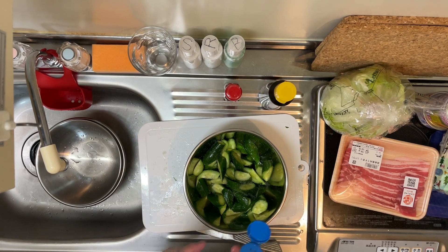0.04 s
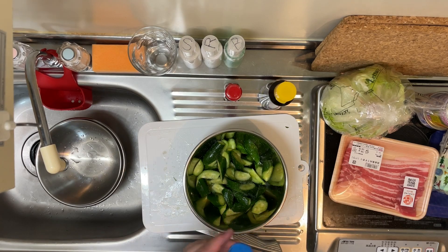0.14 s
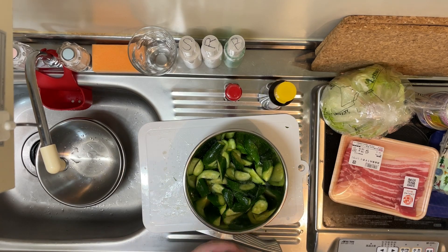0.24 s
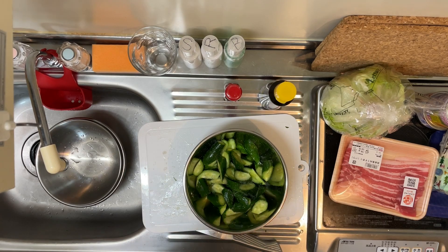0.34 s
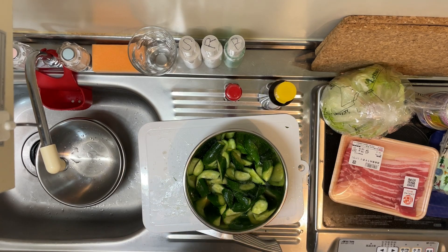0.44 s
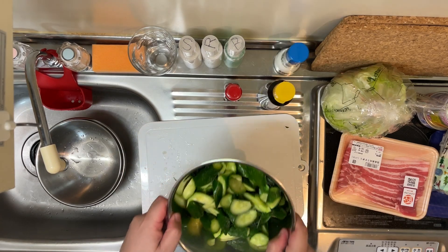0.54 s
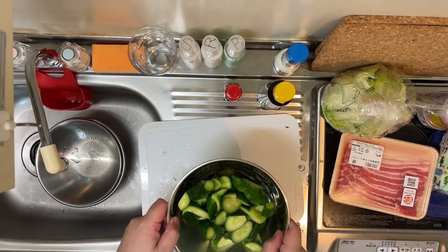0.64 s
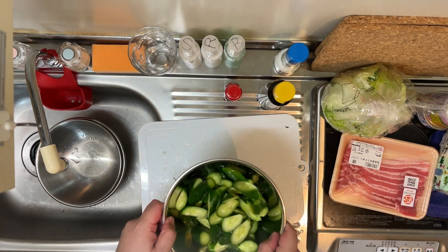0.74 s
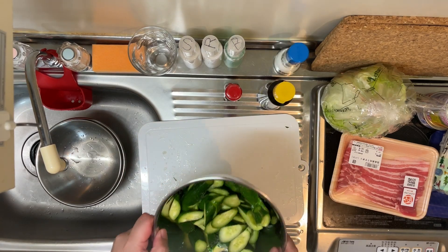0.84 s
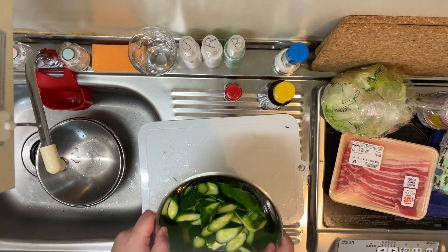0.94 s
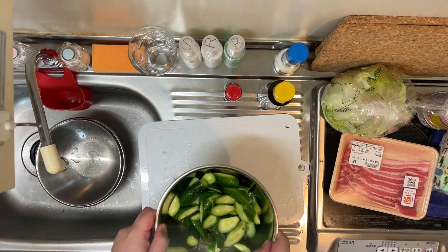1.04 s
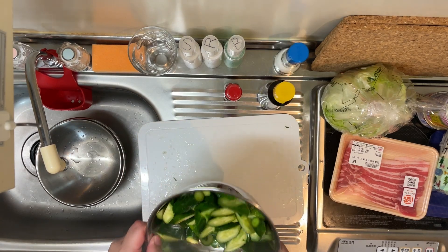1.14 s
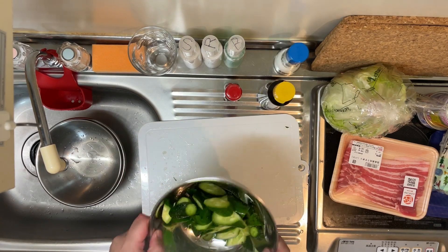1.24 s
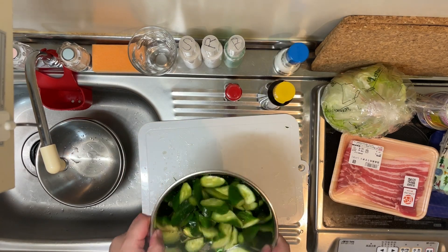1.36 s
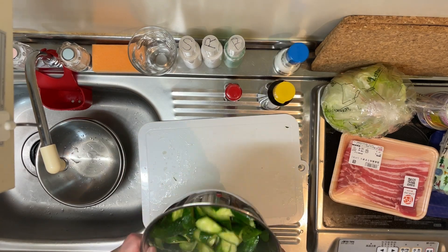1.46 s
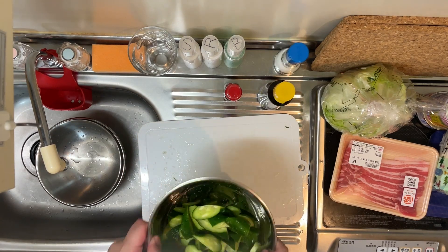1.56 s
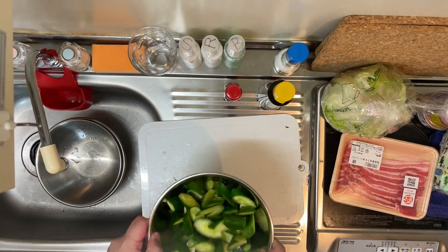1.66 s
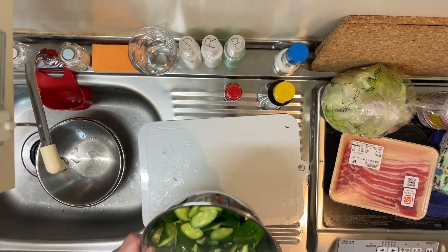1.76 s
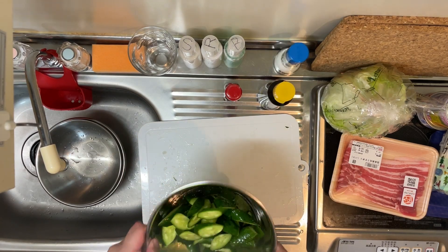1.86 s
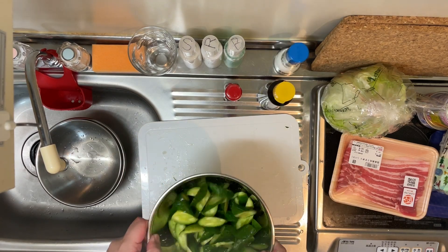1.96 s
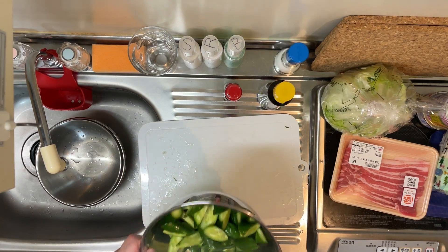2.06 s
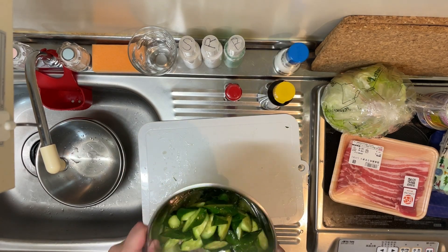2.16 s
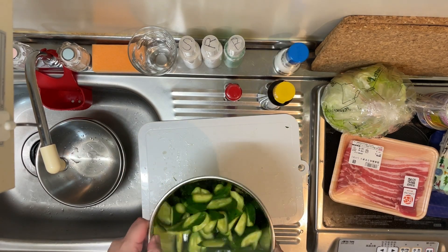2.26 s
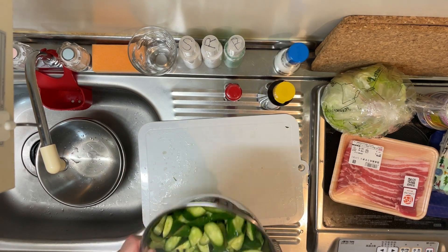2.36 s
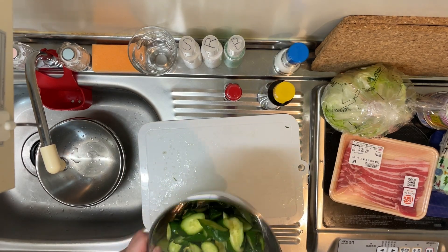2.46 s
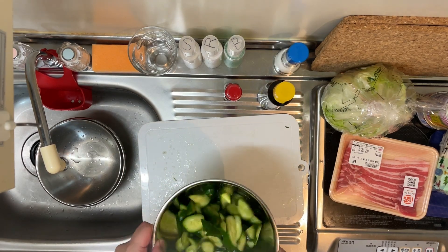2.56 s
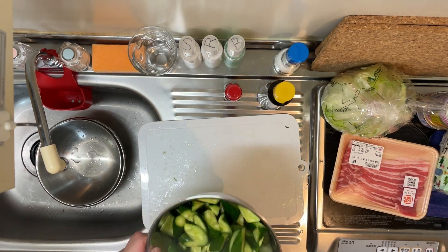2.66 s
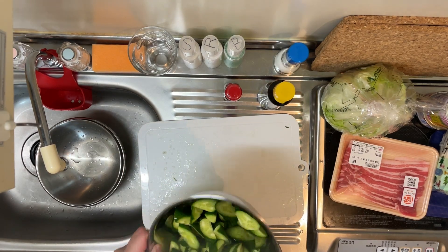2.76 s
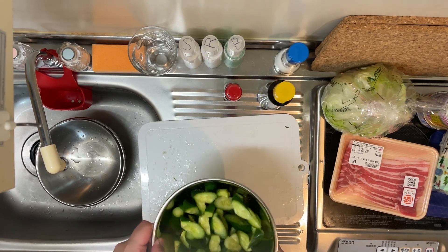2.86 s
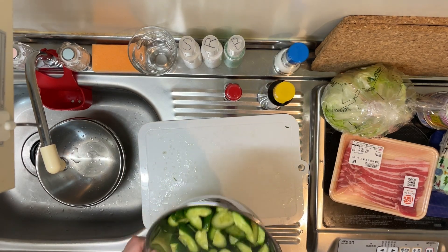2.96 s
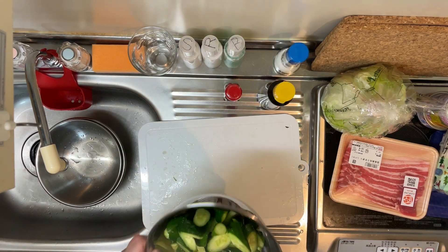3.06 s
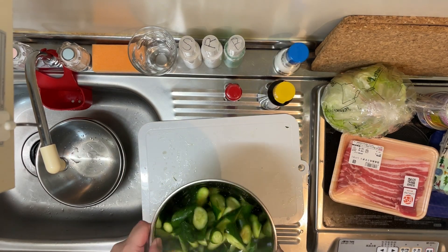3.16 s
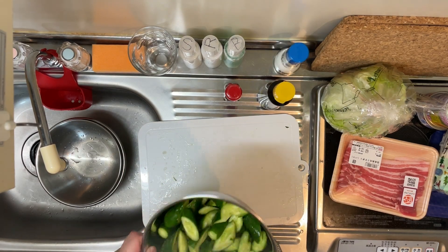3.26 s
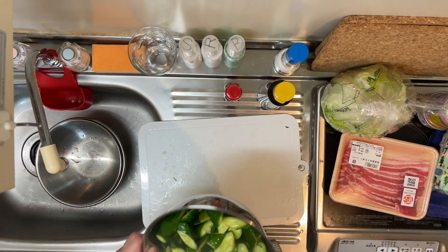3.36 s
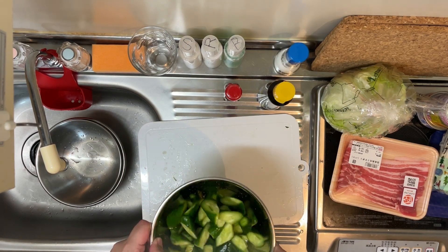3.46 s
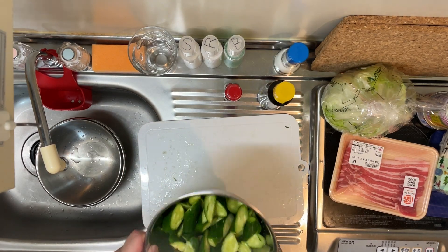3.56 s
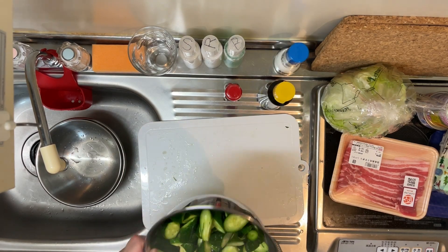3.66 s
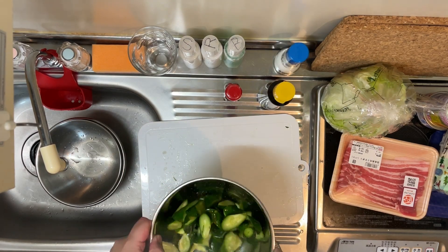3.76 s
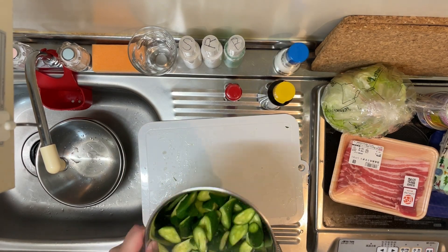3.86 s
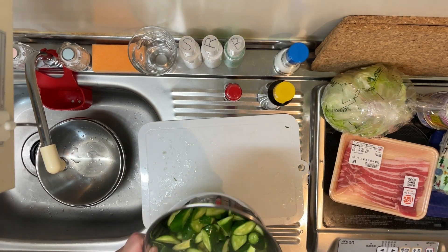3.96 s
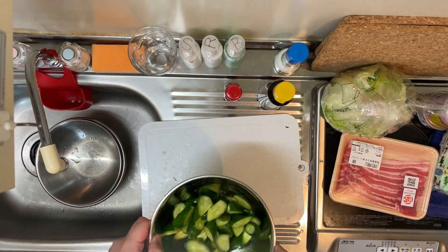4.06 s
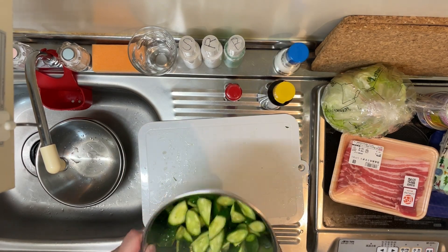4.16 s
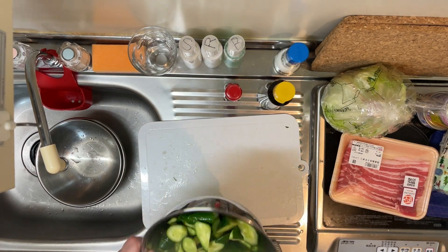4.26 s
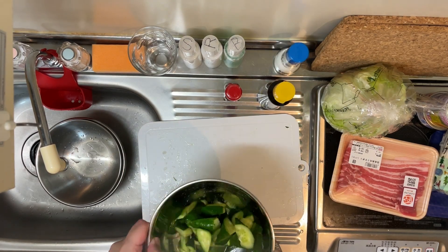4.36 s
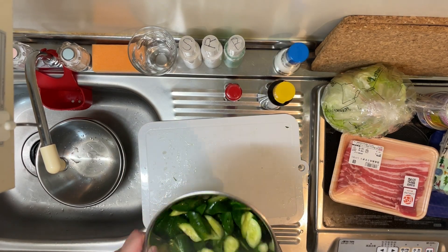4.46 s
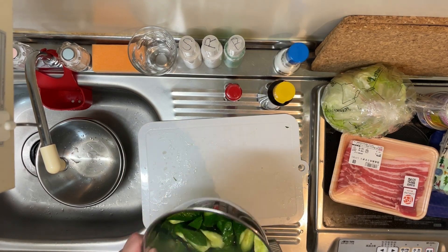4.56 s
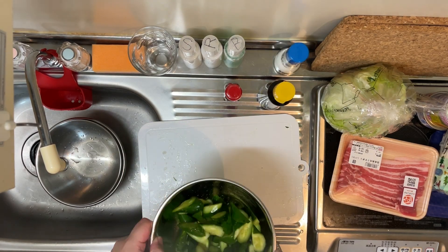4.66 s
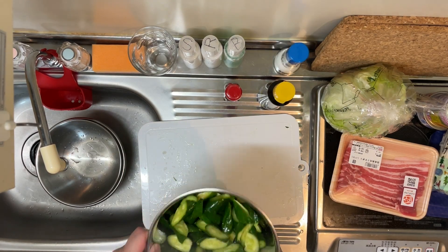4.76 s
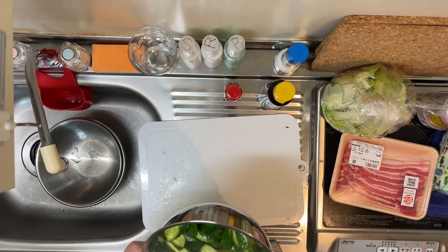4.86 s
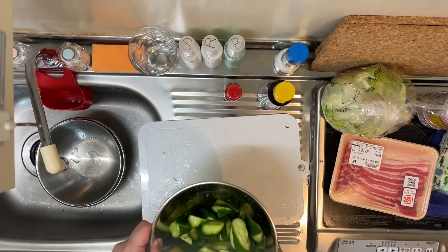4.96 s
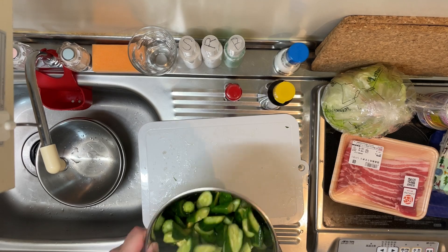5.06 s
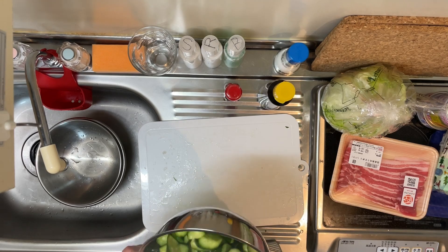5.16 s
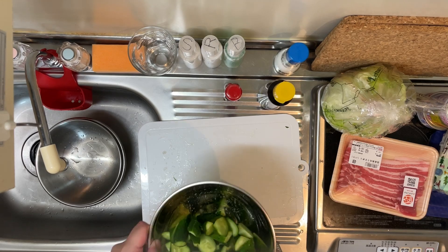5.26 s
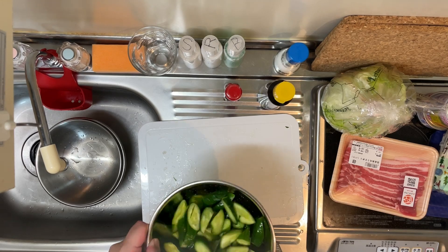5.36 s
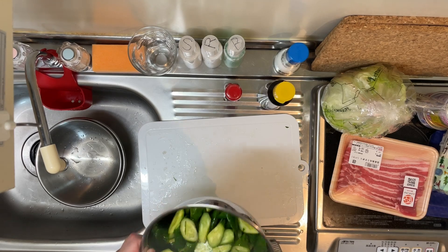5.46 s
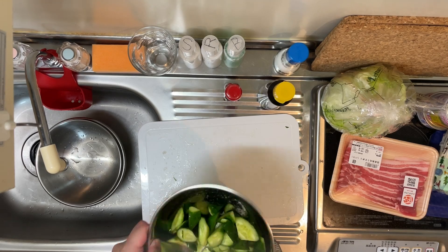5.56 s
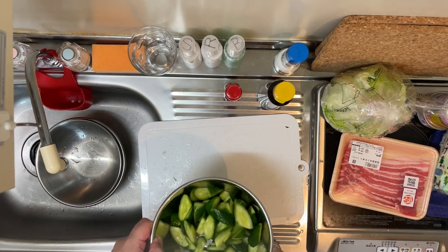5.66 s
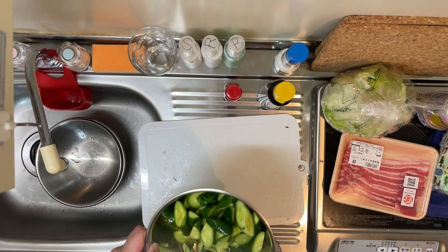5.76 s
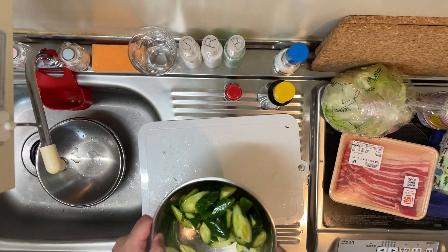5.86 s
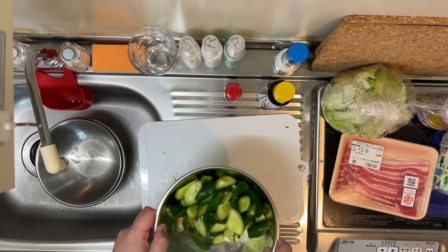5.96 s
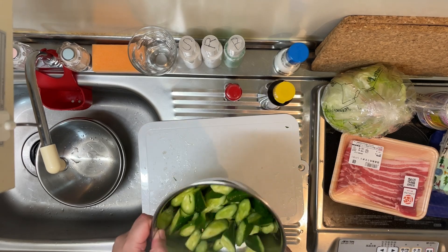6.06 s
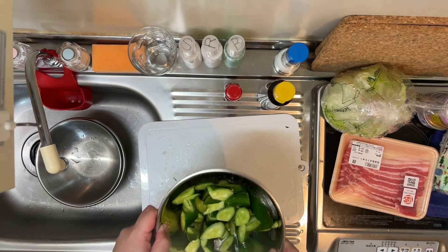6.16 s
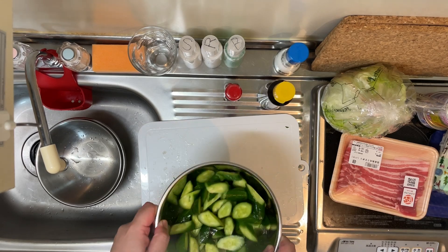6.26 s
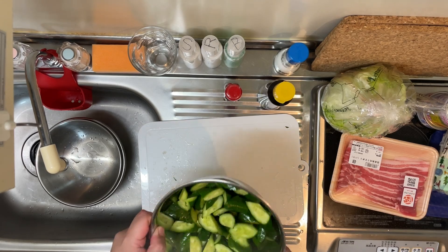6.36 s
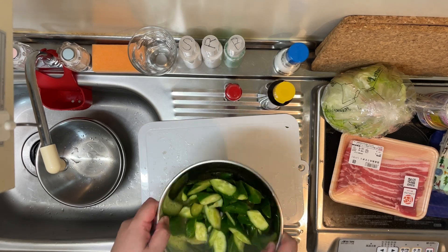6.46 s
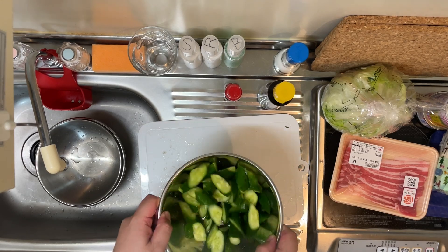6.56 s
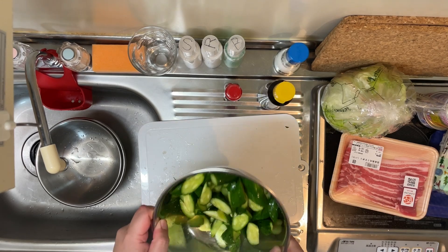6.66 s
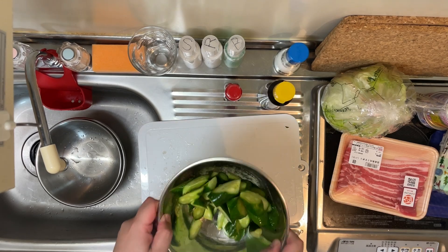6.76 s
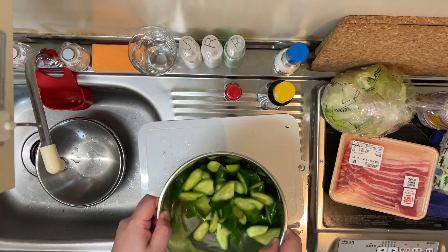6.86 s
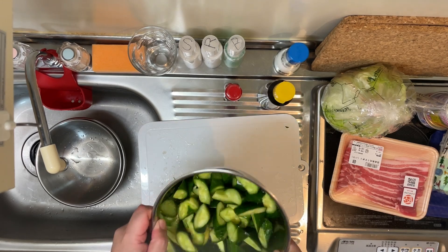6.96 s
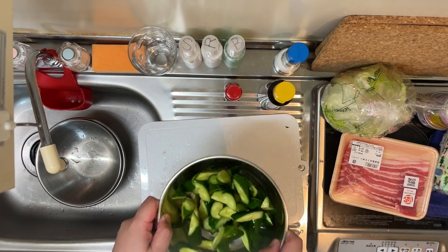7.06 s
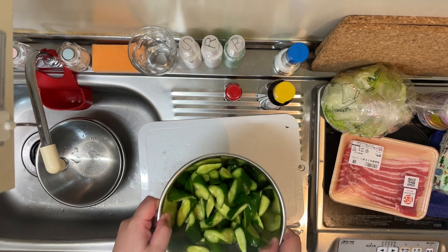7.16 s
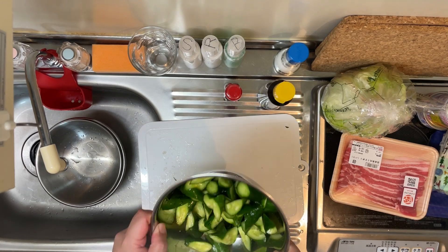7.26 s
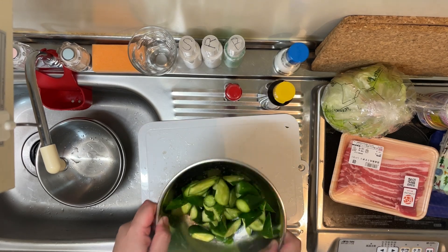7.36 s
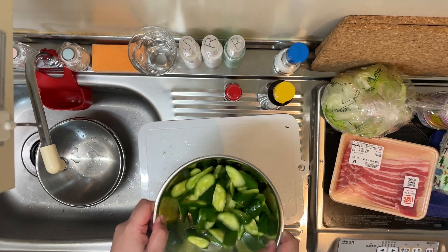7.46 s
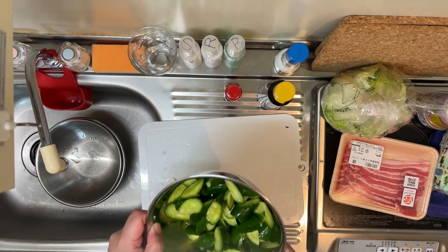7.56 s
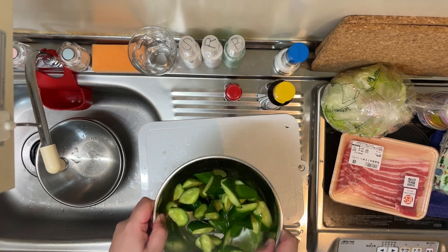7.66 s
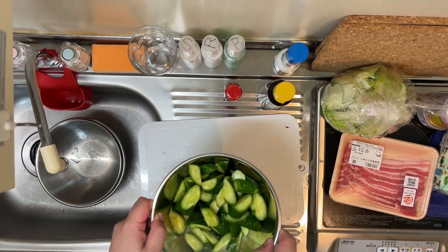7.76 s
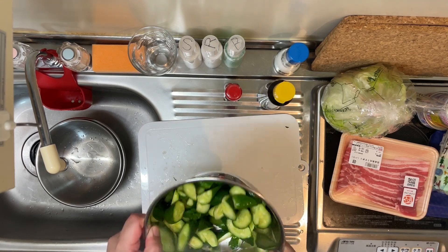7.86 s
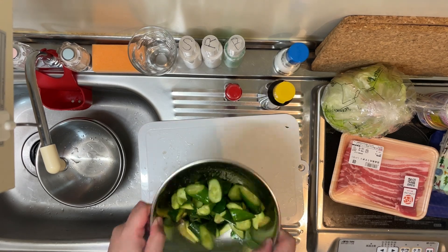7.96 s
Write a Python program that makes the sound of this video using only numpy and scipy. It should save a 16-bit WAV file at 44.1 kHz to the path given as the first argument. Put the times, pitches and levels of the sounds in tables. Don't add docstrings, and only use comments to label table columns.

```python
import sys
import numpy as np
from scipy import signal
from scipy.fft import rfft, irfft, next_fast_len
from scipy.io import wavfile

SR = 44100
rng = np.random.default_rng(int(sys.argv[2]) if len(sys.argv) > 2 else 0)


def store_wav(level_fs):
    pcm = np.round(np.clip(np.atleast_2d(level_fs), -1, 1) * 32767)
    wavfile.write(sys.argv[1], SR, pcm.T.astype(np.int16))


def convert_level_to_amplitude(level_db):
    exponent = np.asarray(level_db, float) / 20
    return 10 ** exponent


N = 353241

# f/Hz, density/dB
HUM = [(30, -35), (80, 0), (290, 1.5), (400, -11.5), (700, -13.5), (1100, -14.5), (2000, -18.5),
       (2600, -25.5), (3600, -26.5), (4500, -43), (10000, -58), (16000, -68)]
# f/Hz, width/Hz, level/dB
FAN_TONES = [(73.5, 15, -51), (288, 7.8, -51), (550, 19, -60), (692, 31, -58)]
# t/s, level/dB
FINGERS = [
    (.025, -74),
    (.045, -60.5),
    (.1, -64),
    (.16, -80),
    (.2, -87),
]
# t/s, knock level/dB, crack level/dB
BOTTLE = [
    (0.3126, -28, -36),
    (0.3139, -30, -40),
    (0.3148, -18.5, -48.5),
    (0.339, -28, -10),
    (0.343, -32, -26),
]
# f/Hz, level/dB, t60/s
COUNTER = [(320, 4.5, 0.08), (494, -8, 0.028), (760, -3, 0.018), (1000, 2, 0.019), (1500, -4.5, 0.012),
           (2480, -3.5, 0.012)]
# f/Hz, density/dB
BOTTLE_CRACK = [(200, -17), (500, -2), (916, -0.5), (2050, -13), (3900, -8.5), (5730, -13), (9230, -4.5),
                (16000, -16)]
# t/s, peak level/dB, f/Hz
DROPLETS = [(0.5836, -53, 9400), (0.7885, -22, 8400), (0.8375, -40, 9400), (1.1892, -51, 9500),
            (2.6414, -20, 8800), (3.014, -31, 9350), (3.232, -24, 7560), (3.3024, -39, 8900),
            (3.368, -37, 8070), (4.5659, -31, 7960), (4.6404, -47, 9300), (5.397, -17.5, 9400),
            (5.5044, -46, 9600), (5.881, -49, 10400), (6.1505, -37, 6411), (6.3267, -23, 7200),
            (6.4383, -46, 9400), (6.9435, -25, 8650), (6.9853, -27, 9600), (7.225, -37, 8800),
            (7.647, -45.5, 10220), (7.9079, -41.5, 8800)]
# t/s, peak level/dB, f/Hz
SLAPS = [(0.73, -19.5, 7200), (0.758, -21.5, 14800), (1.048, -15, 8600), (1.0562, -22, 14500),
         (1.3357, -21, 7000), (1.3631, -19.5, 8750), (1.6615, -16, 5760), (1.684, -17, 9100),
         (1.9533, -20, 7500), (2.2512, -21, 7200), (2.2766, -18.5, 7540), (2.61, -13.5, 5700),
         (3.2045, -19, 9000), (3.514, -19, 7300), (3.8014, -22, 8400), (3.835, -16, 9000),
         (4.1226, -16.5, 7400), (4.1394, -18, 8850), (4.4105, -13, 7060), (5.035, -15.5, 6250),
         (5.3363, -30, 5900), (5.3657, -20, 7400), (5.686, -20.5, 8700), (5.97, -17, 7460),
         (6.2656, -29, 7100), (6.5625, -25, 8604), (6.586, -21, 8650), (6.866, -16, 8600),
         (7.4538, -21.5, 8342), (7.4882, -19.5, 8850), (7.7451, -15.5, 5440)]
# f/Hz, density/dB
WET = [(710, -9.5), (1370, 3.5), (1770, -19), (1950, 2), (3080, -1), (8820, -13.5), (11800, -17.5),
       (14400, -12), (16000, -17.5)]
# f/Hz, width/Hz, level/dB
WET_RINGS = [(5650, 300, -9), (6950, 350, -4), (8600, 450, -2), (9250, 400, -5)]
# t/s, peak level/dB
NUDGES = [(0.671, -23), (0.702, -15), (1.01, -14), (2.568, -19), (3.48, -21), (4.373, -20), (4.684, -17.5),
          (4.982, -19), (5.315, -21), (5.617, -21.5), (5.922, -12), (6.047, -17.5), (6.186, -23),
          (6.228, -16.5), (6.33, -17), (6.478, -18), (6.505, -14), (6.635, -21.5), (7.108, -18),
          (7.126, -17), (7.716, -20)]
# t/s, click level/dB, wet level/dB
GRAZES = [(0.701, -29.5, -28), (1.924, -26, -19), (2.231, -25.5, -43), (2.546, -38, -38),
          (2.566, -24, -17.5), (2.859, -29, -26), (3.486, -20, -26), (3.781, -36, -26), (4.0617, -42, -39),
          (4.222, -48, -51), (4.379, -26.5, -24.5), (4.6807, -29, -29.5), (4.977, -42, -39),
          (5.008, -33, -22), (5.315, -38, -37), (5.777, -23.5, -28), (5.92, -31, -41), (6.8456, -22, -47),
          (7.428, -29, -25.5)]
# t/s, peak level/dB, f/Hz
CLACKS = [(6.255, -21, 2070), (6.9853, -26.5, 1510), (0.7205, -20, 2200), (0.727, -10, 1476),
          (0.751, -12, 2280), (1.0485, -16.5, 3250), (1.3607, -14, 3170), (1.9858, -18, 4000),
          (2.0028, -9.5, 3140), (2.253, -18, 4170), (2.275, -20, 4400), (3.1965, -30, 3320),
          (3.7903, -20, 4170), (3.805, -12, 3250), (4.0613, -28, 2320), (4.2225, -32, 1103),
          (4.7159, -5.5, 3250), (5.035, -13, 3520), (5.0497, -4.5, 3170), (5.339, -14.5, 4290),
          (5.3676, -11, 3280), (5.675, -16.5, 2540), (5.6845, -11.5, 3020), (5.9692, -18, 4070),
          (6.5591, -17.5, 3010), (6.5859, -14.5, 3100), (6.8821, -10.5, 3250), (7.1477, -8, 3150),
          (7.4457, -17, 3220), (7.4631, -13.5, 3200), (7.769, -14, 3040)]
# level/dB, width/f, t60/s
CLACK_SHAPE = (-9.5, 0.7, 0.045)
# f/Hz, level/dB, t60/s
BOWL_HIGH = [(2250, -3, .04), (3150, 0, .065), (3230, -3.5, .04), (3960, -5, .035)]
# t/s, thud level/dB, wall click level/dB
LEADERS = [(0.714, -4.5, -40), (1.0283, -9, -14), (1.3277, -13.5, -17.5), (1.6345, -17.5, -30),
           (1.9531, -23, -30), (2.2609, -19.5, -48), (2.5963, -25, -31), (2.8768, -20, -38),
           (3.1658, -21, -25), (3.5, -25, -18), (3.8028, -20, -27), (4.1105, -18, -24), (4.4074, -25, -25),
           (4.7185, -13, -37), (5.0195, -18, -38), (5.3376, -13.5, -21), (5.6311, -16.5, -24.5),
           (5.9452, -23, -27), (6.2403, -16.5, -40), (6.531, -17, -30), (6.8263, -23, -32),
           (7.1428, -14, -36), (7.443, -17, -26), (7.7405, -10.5, -18)]
# t/s, peak level/dB, struck spot f/Hz
THUDS = [(0.7205, -2, 699), (0.7545, -18, 810), (1.0604, -5, 696), (1.6875, -21, 706), (1.9857, -14.5, 568),
         (2.0006, -11.5, 675), (2.2765, -15.5, 650), (2.284, -18.5, 640), (2.6145, -24, 667),
         (2.8575, -26.5, 760), (3.1986, -15, 710), (3.5097, -15.5, 667), (3.53, -22, 760), (3.85, -24, 720),
         (4.4166, -12.5, 595), (4.746, -13, 736), (5.0319, -17.5, 680), (5.066, -16, 566),
         (5.3574, -9.5, 550), (5.9654, -10, 660), (5.9733, -7.5, 670), (5.9989, -13, 695),
         (6.2545, -9, 654), (6.2905, -12, 760), (6.3019, -7.5, 688), (6.8745, -17, 580),
         (6.8823, -11, 529.2), (6.898, -18, 650), (7.1701, -13, 577), (7.187, -12.5, 656),
         (7.4568, -12, 703)]
# t/s, peak level/dB, struck spot f/Hz
MORE_LANDINGS = [(0.7312, -15, 760), (1.0468, -11, 644), (1.0738, -18, 730), (1.0925, -25, 604),
                 (1.3642, -22, 694), (1.3947, -25, 680), (1.6582, -16, 860), (1.6702, -16, 910),
                 (1.6904, -15.5, 820), (1.7022, -24, 530), (1.71, -26, 796), (1.9743, -21, 615),
                 (2.6027, -27, 680), (2.6191, -23, 686), (2.6304, -24, 640), (2.6436, -26, 677),
                 (2.9087, -21.5, 640), (3.239, -20, 667), (3.8124, -16.5, 756), (3.835, -21, 706),
                 (4.1221, -14.5, 695), (4.1297, -14, 690), (4.1373, -36, 614), (4.4334, -23, 644),
                 (4.7261, -11.5, 700), (4.7393, -32, 646), (5.0498, -20, 700), (5.0775, -19, 740),
                 (5.0852, -16.5, 760), (5.3668, -14, 654), (5.3826, -12, 700), (5.651, -17.5, 700),
                 (5.6584, -15.5, 630), (5.667, -15, 595), (5.6842, -20, 795), (5.6919, -19, 700),
                 (5.7001, -16, 656), (5.7096, -20.7, 656), (5.9521, -18, 690), (5.9823, -22, 666),
                 (6.0111, -18, 664), (6.2763, -14, 720), (6.5621, -14.5, 790), (6.5773, -15, 670),
                 (6.587, -16, 680), (6.6032, -14.5, 700), (6.847, -19, 670), (6.903, -22, 630),
                 (6.934, -19, 736), (7.1567, -14, 670), (7.2007, -22.5, 676.4), (7.4501, -19, 604),
                 (7.4742, -17, 560), (7.4958, -17, 660), (7.517, -21, 654), (7.7465, -8, 730),
                 (7.7615, -12.5, 670), (7.7737, -23, 600), (7.7853, -16.5, 760), (7.7956, -32, 580.5)]
# f/Hz, level/dB, t60/s
BOWL_LOW = [(464.3, -0.5, 0.067), (532.3, -1, 0.092), (595, -5, 0.035), (661, -1, 0.064), (694, -3, 0.038),
            (748, -3.5, 0.1), (896, -3, 0.073), (1052, 0, 0.033)]
# f/Hz, level/dB, t60/s
HEAP = [(202.6, -34.5, 0.1), (246, -16, 0.043), (317, -19, 0.044), (1430, -23.5, 0.01), (1590, -26, 0.011)]
# start t/s, fullest t/s, settled t/s, rumble level/dB, wet sliding level/dB
TUMBLE = [(0.72, 0.789, 0.84, -29, -46.5), (1.021, 1.062, 1.112, -22.5, -29),
          (1.335, 1.36, 1.434, -21, -31.5), (1.639, 1.683, 1.727, -19, -29.5),
          (1.931, 1.949, 2.046, -23.5, -35), (2.244, 2.291, 2.327, -20, -31),
          (2.565, 2.612, 2.67, -18, -30.5), (2.859, 2.89, 2.92, -21.5, -31.5),
          (3.163, 3.196, 3.27, -21, -34), (3.468, 3.523, 3.56, -21.5, -31.5),
          (3.771, 3.815, 3.885, -21.5, -32), (4.073, 4.132, 4.19, -23, -32.5),
          (4.385, 4.422, 4.5, -22.5, -30.5), (4.703, 4.74, 4.777, -18, -32), (5.011, 5.06, 5.1, -22, -29),
          (5.327, 5.361, 5.443, -18, -31.5), (5.639, 5.689, 5.743, -23, -31.5),
          (5.906, 5.986, 6.08, -24.5, -37), (6.24, 6.289, 6.33, -21, -30.5),
          (6.507, 6.573, 6.66, -23, -38.5), (6.838, 6.878, 6.99, -24.5, -36),
          (7.118, 7.183, 7.24, -23, -38), (7.42, 7.497, 7.54, -21, -37), (7.74, 7.778, 7.816, -16.5, -31)]
# t/s, peak level/dB, f/Hz
SPITS = [(0.718, -31, 8550), (0.7409, -34, 9900), (1.0641, -22, 8900), (1.0744, -21.5, 8610),
         (1.37, -21.5, 11640), (1.6672, -25, 8950), (1.701, -24, 12000), (1.7316, -31, 9800),
         (1.7459, -33, 8880), (1.9735, -30, 9260), (2.03, -36, 9000), (2.5761, -21.5, 9040),
         (2.5883, -23, 8660), (2.6423, -28, 8800), (3.2342, -33.0, 13730), (3.5012, -40, 8810),
         (3.5325, -31, 8840), (3.8704, -28, 9350), (4.1438, -27.7, 9110), (4.4417, -29, 8580),
         (5.048, -23, 8900), (5.3392, -30, 8577), (5.4025, -30, 9290), (5.7007, -36, 8670),
         (5.7229, -46, 7820), (6.897, -22.5, 8650), (7.17, -25, 8600), (7.8041, -36, 8936)]
# t/s, peak level/dB, f/Hz
KNOCKS = [(0.7213, -16, 2280), (0.741, -25, 1070), (0.771, -26.5, 1250), (1.0316, -31, 1150),
          (1.0448, -22, 1050), (1.4157, -38, 1390), (2.009, -24, 2450), (2.2547, -29, 1040),
          (2.279, -28, 2330), (2.617, -18, 1070), (3.1707, -25.5, 1360), (3.5156, -19, 1210),
          (3.5388, -24, 1180), (3.816, -23, 1420), (4.062, -28, 1500), (4.135, -23.5, 2000),
          (4.4211, -37, 1060), (4.717, -17.5, 1380), (5.0508, -18.5, 2290), (5.3593, -23.8, 1060),
          (5.6507, -23, 1150), (6.0145, -27, 1340), (6.578, -24, 2293), (6.6092, -31.0, 1440),
          (7.479, -26, 2330), (7.8155, -28, 1050)]
# t/s, peak level/dB, f/Hz
WALL_SINGS = [(0.728, -32, 3090), (1.0467, -27, 3194), (1.073, -35, 3125), (1.337, -33, 3170),
              (1.3694, -25.5, 3160), (1.637, -34, 3130), (1.951, -32, 3200), (2.288, -28.5, 3200),
              (3.179, -34, 3170), (3.1944, -30, 3180), (3.811, -25, 3170), (3.825, -31, 3110),
              (4.1237, -32, 3040), (4.719, -32, 3164), (5.051, -28, 3160), (5.0968, -35, 3190),
              (5.683, -26, 3066), (6.564, -29, 3090), (7.175, -33, 3250), (7.4762, -31, 3080),
              (7.745, -29, 3130)]
# t/s, peak level/dB
TINGS = [
    (5.881, -47),
    (6.151, -41.5),
]
# f/Hz, level/dB, t60/s
RIM = [(4530, -7, .13), (5340, -5, 0.13), (6000, -5, .08), (6440, -7, 0.09), (6920, -3, .045),
       (7620, -7, 0.088)]
# t/s, peak level/dB
SLAMS = [(0.753, -12.5), (1.686, -9), (2.295, -15), (2.613, -9), (3.502, -12), (3.5285, -10.5),
         (3.848, -13), (4.7175, -8), (6.873, -8.5), (6.8965, -11), (7.7395, -7.5)]
# t/s, peak level/dB, f/Hz
TICKS = [(0.7813, -30, 6900), (1.061, -37, 4030), (1.361, -25, 4080), (1.4005, -29, 7450),
         (1.6358, -33, 4230), (1.7017, -23, 3880), (1.9369, -33.6, 7160), (1.98, -43, 5340),
         (2.2758, -21.5, 4130), (2.289, -40, 6000), (2.584, -24, 6600), (2.633, -34.1, 6910),
         (2.8847, -29, 3940), (3.1963, -30, 3440), (4.1088, -33, 4000), (4.122, -26.5, 3980),
         (4.45, -25, 4180), (4.7157, -22, 3850), (5.0977, -32, 4160), (5.3296, -34, 4230),
         (5.3683, -24, 4130), (5.7244, -37, 7400), (5.9902, -31, 3990), (6.2546, -28, 3750),
         (6.2935, -23.5, 3950), (7.142, -31, 4130), (7.7373, -32, 5545), (7.773, -37, 3950)]

LEADER_LAG_S, LEADER_CLICK_HZ = 0.00094, (1850, 2490)


def rms_one(x):
    return x / np.sqrt(np.mean(x ** 2) + 1e-20)


def add(out, s, burst):
    at = int(s * SR)
    out[at:at + len(burst)] += burst[:N - at]


def clicks(times_s, gains):
    out = np.full(N, 1e-18)
    np.add.at(out, np.round(np.asarray(times_s) * SR).astype(int), gains)
    return out


def ring(x, hz, t60_s):
    r = convert_level_to_amplitude(-60 / (t60_s * SR))
    w = 2 * np.pi * hz / SR
    return signal.lfilter([0, np.sin(w)], [1, -2 * r * np.cos(w), r * r], x)


def resonance(x, hz, width_hz):
    r = np.exp(-np.pi * width_hz / SR)
    w = 2 * np.pi * hz / SR
    return signal.lfilter([(1 - r * r) / 2, 0, (r * r - 1) / 2], [1, -2 * r * np.cos(w), r * r], x)


def soft(x, hz):
    r = np.exp(-2 * np.pi * hz / SR)
    return signal.lfilter([(1 - r) ** 2], [1, -2 * r, r * r], x)


def dying(x, t60_s):
    return signal.lfilter([1], [1, -convert_level_to_amplitude(-60 / (t60_s * SR))], x)


def coloured(spectrum, x):
    size = next_fast_len(N)
    hz = np.maximum(np.fft.rfftfreq(size, 1 / SR), 10)
    point_hz, point_db = np.transpose(spectrum)
    gain = convert_level_to_amplitude(np.interp(np.log(hz), np.log(point_hz), point_db))
    return rms_one(irfft(rfft(x, size) * gain, size)[:N])


def grains(per_s, spread_db):
    sizes = convert_level_to_amplitude(spread_db * np.minimum(rng.exponential(1, N), 4)) * rng.choice([-1, 1], N)
    return rms_one(sizes * (rng.random(N) < per_s / SR))


def drift(rate_hz):
    slow = rms_one(soft(rng.standard_normal(N // 20 + 2), 20 * rate_hz))
    return np.interp(np.arange(N) / 20, np.arange(len(slow)), 2 * np.tanh(slow / 2))


def struck(events, modes, reach, scatter_db):
    s, peak_db, spot_hz = np.transpose(events)
    luck = rng.standard_normal((len(s), len(modes)))
    near = np.array([np.exp(-(np.log(hz / spot_hz) / reach) ** 2) * convert_level_to_amplitude(db) for hz, db, t60_s in modes]).T
    near = (near + 0.073) * convert_level_to_amplitude(scatter_db * luck)
    share = near / near.sum(axis=1, keepdims=True)
    out = np.zeros(N)
    for k, (hz, db, t60_s) in enumerate(modes):
        out += ring(clicks(s, convert_level_to_amplitude(peak_db) * share[:, k]), hz, t60_s)
    return out


def pats(contacts, gain_db, width_share, t60_s):
    out, age = np.zeros(N), np.arange(2500) / SR
    for (s, db, hz), noise in zip(contacts, rng.standard_normal((len(contacts), len(age)))):
        burst = resonance(noise * convert_level_to_amplitude(-60 * age / t60_s), hz, width_share * hz)
        burst = resonance(burst, hz, 2 * width_share * hz)
        add(out, s, convert_level_to_amplitude(db + gain_db) * burst / np.abs(burst).max())
    return out


def toss_level(levels_db, edge_db, lead_s, settle_s, rest_db):
    rows = []
    for (start, fullest, settled, *_), db in zip(TUMBLE, levels_db):
        rows += [(start - lead_s, rest_db), (start, db + edge_db), (fullest, db)]
        rows += [(settled, db + edge_db), (settled + settle_s, rest_db)]
    s, db = np.transpose(rows)
    return convert_level_to_amplitude(np.interp(np.arange(N) / SR, s, db))


def fan():
    out = convert_level_to_amplitude(-44) * coloured(HUM, rng.standard_normal(N))
    for hz, width_hz, db in FAN_TONES:
        tone = rms_one(resonance(rng.standard_normal(N), hz, width_hz))
        out += convert_level_to_amplitude(db + 3.3 * drift(1.1)) * tone
    return out


def fingers():
    s, db = np.transpose(FINGERS)
    level = convert_level_to_amplitude(np.interp(np.arange(N) / SR, s, db, right=-120) + 2.5 * drift(60))
    rustle = resonance(grains(4000, 2.87), 11100, 8200)
    return level * rms_one(resonance(rustle, 11100, 8200))


def bottle():
    s, knock_db, crack_db = np.transpose(BOTTLE)
    hits = clicks(s, convert_level_to_amplitude(knock_db - 7.5))
    knock = sum(convert_level_to_amplitude(db) * ring(hits, hz, t60_s) for hz, db, t60_s in COUNTER)
    blows = clicks(s, convert_level_to_amplitude(crack_db - 6.0))
    fade = dying(blows, 0.0088) + convert_level_to_amplitude(-5.5) * dying(blows, 0.044) + convert_level_to_amplitude(-31.0) * dying(blows, 0.13)
    return knock + fade * coloured(BOTTLE_CRACK, rng.standard_normal(N))


def wet_contacts():
    smacks = [(s + LEADER_LAG_S, -37, 6900) for s, thud_db, click_db in LEADERS]
    grazes = [(s, wet_db, 7200) for s, click_db, wet_db in GRAZES]
    return list(SLAPS) + list(DROPLETS) + smacks + grazes


def wetness(sliding):
    slaps, age = np.zeros(N), np.arange(3000) / SR
    front = convert_level_to_amplitude(-8.0) * convert_level_to_amplitude(-60 * age / 0.0036)
    body = convert_level_to_amplitude(-60 * age / 0.072) * (1 - np.exp(-age / 0.00084)) * 1.42
    bursts = wet_contacts()
    for (s, peak_db, hz), noise in zip(bursts, rng.standard_normal((len(bursts), len(age)))):
        rough = noise * (front + body)
        burst = resonance(rough, hz, 0.089 * hz) + convert_level_to_amplitude(-12.5) * resonance(rough, 11600, 10000)
        add(slaps, s, convert_level_to_amplitude(peak_db - 5.0) * burst)
    crackle = coloured(WET, grains(2600, 2.7))
    patches = np.zeros(N)
    for k, hz in enumerate(np.geomspace(1300, 15000, 8)):
        patches += convert_level_to_amplitude(3.5 * drift(31)) * resonance(crackle, hz, 0.77 * hz) * (-1) ** k
    rings = np.zeros(N)
    for hz, width_hz, db in WET_RINGS:
        rings += convert_level_to_amplitude(db + 6.9 * drift(26)) * rms_one(resonance(crackle, hz, width_hz))
    stirring = sliding + convert_level_to_amplitude(-78 + 5.6 * drift(29.0))
    return slaps + stirring * (rms_one(patches) + convert_level_to_amplitude(-11.0) * rings)


def nudges():
    s, peak_db = np.transpose(NUDGES)
    touch = clicks(s, convert_level_to_amplitude(np.minimum(peak_db, -12.5) - 10.5))
    return resonance(ring(touch, 681.0, 0.13) + convert_level_to_amplitude(-16) * ring(touch, 730, 0.07), 730, 124)


def wall_contacts():
    led = [(s + LEADER_LAG_S, click_db, rng.choice(LEADER_CLICK_HZ)) for s, thud_db, click_db in LEADERS]
    return list(CLACKS) + led + [(s, click_db, 2900) for s, click_db, wet_db in GRAZES]


def clacks(sliding):
    contacts = wall_contacts()
    spots, age = np.zeros(N), np.arange(1500) / SR
    for s, db, hz in contacts:
        add(spots, s, convert_level_to_amplitude(db - 17.5 - 60 * age / 0.071) * np.sin(2 * np.pi * hz * age))
    crack = pats(contacts, *CLACK_SHAPE)
    ticking = rms_one(sum(convert_level_to_amplitude(db) * ring(grains(350, 3.1), hz, t60_s) for hz, db, t60_s in BOWL_HIGH))
    hits = resonance(struck(contacts, BOWL_HIGH, reach=0.27, scatter_db=5.5), 2600, 3600)
    return spots + convert_level_to_amplitude(-12) * hits + crack + convert_level_to_amplitude(-9.5) * sliding * ticking


def landing_pieces():
    bottom_hz = 695
    led = [(s, thud_db, bottom_hz) for s, thud_db, click_db in LEADERS]
    return np.vstack([THUDS, led, np.add(MORE_LANDINGS, [0, -1, 0])])


def thuds(tumbling):
    pieces = landing_pieces()
    s, peak_db, spot_hz = np.transpose(pieces)
    landings, age = np.zeros(N), np.arange(1800) / SR
    swell = (age / 0.0035) ** 1.84 * np.exp(1.99 * (1 - age / 0.0033))
    for at, db, hz, phase in zip(s, peak_db, spot_hz, rng.uniform(0, 2 * np.pi, len(s))):
        turn = 2 * np.pi * hz * age
        tones = np.sin(turn + phase) + convert_level_to_amplitude(-14.5) * np.sin(1.293 * turn - phase)
        add(landings, at, convert_level_to_amplitude(db - 0.9) * swell * tones)
    ringing = convert_level_to_amplitude(-7.0) * resonance(struck(pieces, BOWL_LOW, reach=0.43, scatter_db=6.0), 960, 890)
    rolling = sum(convert_level_to_amplitude(db) * ring(grains(250, 3.76), hz, t60_s) for hz, db, t60_s in BOWL_LOW)
    rumble = rms_one(resonance(rolling, 656, 306))
    push = clicks(s, convert_level_to_amplitude(0.68 * peak_db - 4) * rng.choice([-1, 1], len(s)))
    push = push + convert_level_to_amplitude(-12.0) * tumbling * grains(400, 2.8)
    heap = sum(convert_level_to_amplitude(db) * resonance(ring(push, hz, t60_s), hz, 1.55 * hz) for hz, db, t60_s in HEAP)
    return landings + ringing + convert_level_to_amplitude(-6.0) * tumbling * rumble + heap


def spits():
    return pats(SPITS, gain_db=-1.1, width_share=0.45, t60_s=0.059)


def knocks():
    return pats(KNOCKS, gain_db=-2.4, width_share=0.19, t60_s=0.043)


def singing():
    out, age = np.zeros(N), np.arange(5000) / SR
    rise = 1 - np.exp(-age / 0.0018)
    for s, db, hz in WALL_SINGS:
        turn = 2 * np.pi * hz * age
        tones = 2 * np.sin(turn) + 0.77 * np.sin(1.1 * turn)
        add(out, s, convert_level_to_amplitude(db - 2.5 - 60 * age / 0.071) * rise * tones)
    s, db = np.transpose(TINGS)
    return out + sum(ring(clicks(s, convert_level_to_amplitude(db + mode_db - 7.5)), hz, t60_s) for hz, mode_db, t60_s in RIM)


def slams():
    out, age = np.zeros(N), np.arange(-200, 200) / SR
    push = -np.exp(-(age / 0.0016) ** 2) * np.cos(2 * np.pi * 640 * age)
    for s, db in SLAMS:
        add(out, s + age[0], convert_level_to_amplitude(db) * push)
    return out


def thump():
    mode_hz, t60_s, contact_hz = 162.6, 0.14, 73
    starts, fullest, settled, rumble_db, sliding_db = np.transpose(TUMBLE)
    jolt = soft(clicks((starts + fullest) / 2, convert_level_to_amplitude(rumble_db + 2.5)), contact_hz)
    return resonance(ring(jolt, mode_hz, t60_s), mode_hz, mode_hz)


def ticks():
    return pats(TICKS, gain_db=-0.79, width_share=0.13, t60_s=0.04)


def kitchen(x):
    gap_s, t60_s, level_db = 0.004, 0.16, -9.5
    t = np.arange(SR // 2) / SR
    tail = rng.standard_normal(len(t)) * convert_level_to_amplitude(-60 * t / t60_s) * (t > gap_s)
    return convert_level_to_amplitude(level_db) * signal.fftconvolve(x, tail / np.sqrt(np.sum(tail ** 2)))[:N]


def scene():
    rumble_db, sliding_db = np.transpose(TUMBLE)[3:]
    tumbling = toss_level(rumble_db, edge_db=-12.5, lead_s=0.038, settle_s=0.15, rest_db=-69.5)
    sliding = toss_level(sliding_db, edge_db=-19, lead_s=0.051, settle_s=0.12, rest_db=-92.5)
    near = fingers() + bottle()
    near = near + wetness(sliding) + nudges() + clacks(sliding) + thuds(tumbling)
    near = near + spits() + knocks() + singing() + slams() + thump() + ticks()
    return (near + kitchen(near) + fan())[None]


def roll_off(x):
    return signal.sosfilt(signal.butter(12, 16820, fs=SR, output="sos"), x)


def record(dry):
    low_hz, high_hz, ceiling = 60, 15900, 0.56
    heard = signal.sosfilt(signal.butter(3, low_hz, "high", fs=SR, output="sos"), dry)
    heard = ceiling * np.tanh(heard / ceiling)
    heard = signal.sosfilt(signal.ellip(10, 0.5, 42, high_hz, fs=SR, output="sos"), heard)
    return roll_off(heard)


dry = scene()
out = record(dry)
store_wav(out)
```